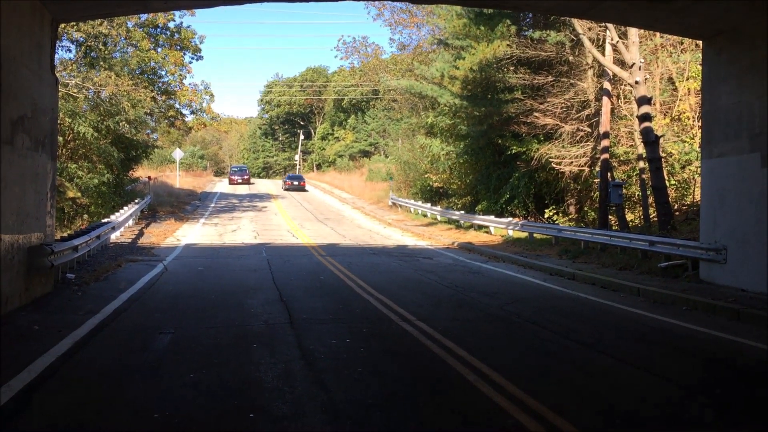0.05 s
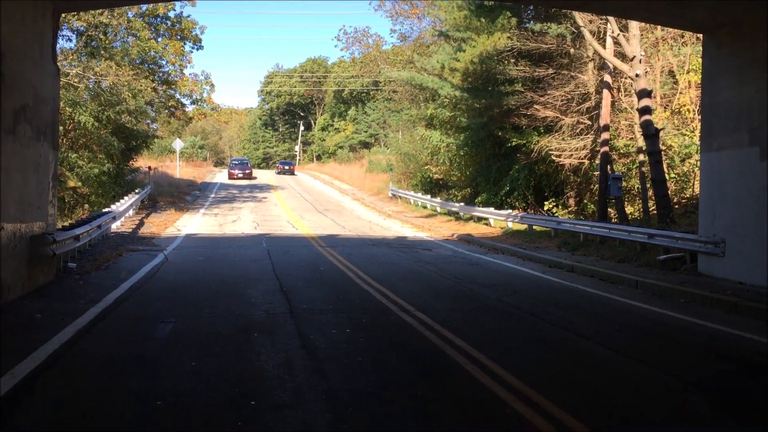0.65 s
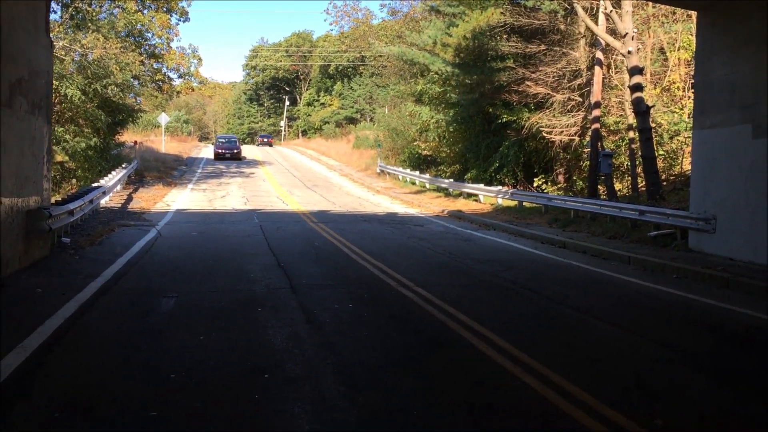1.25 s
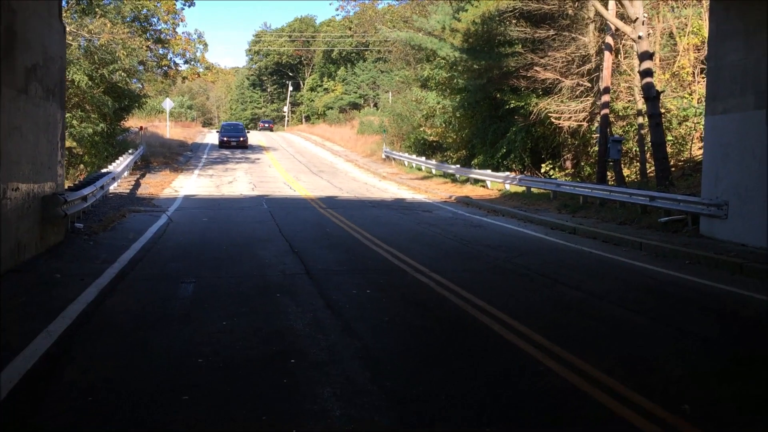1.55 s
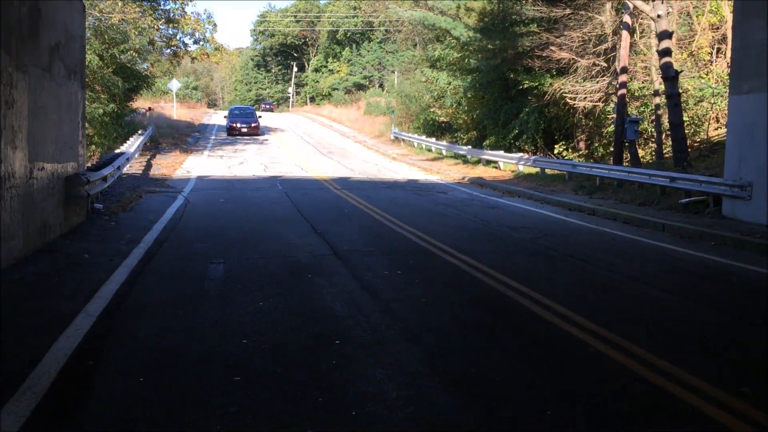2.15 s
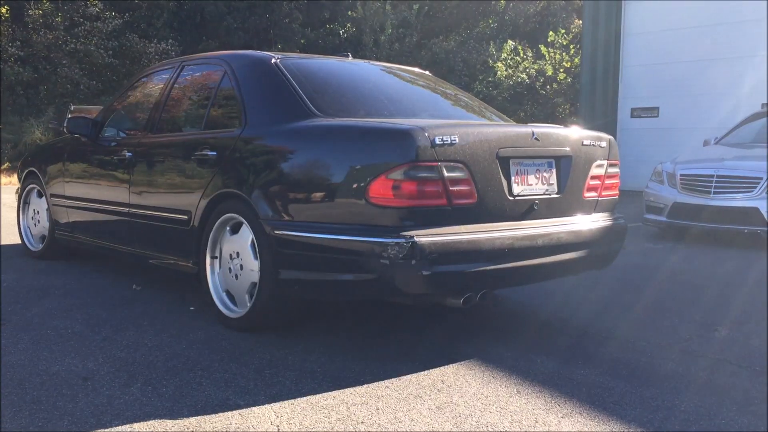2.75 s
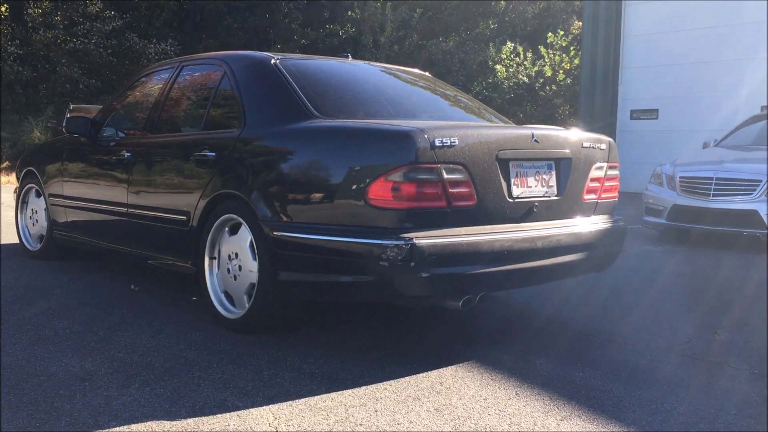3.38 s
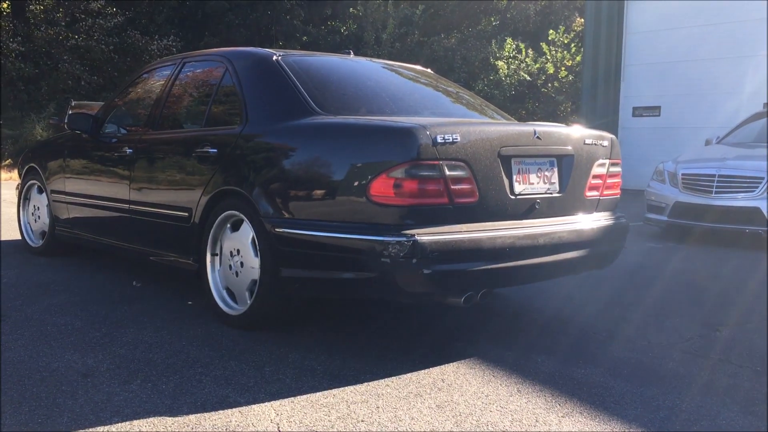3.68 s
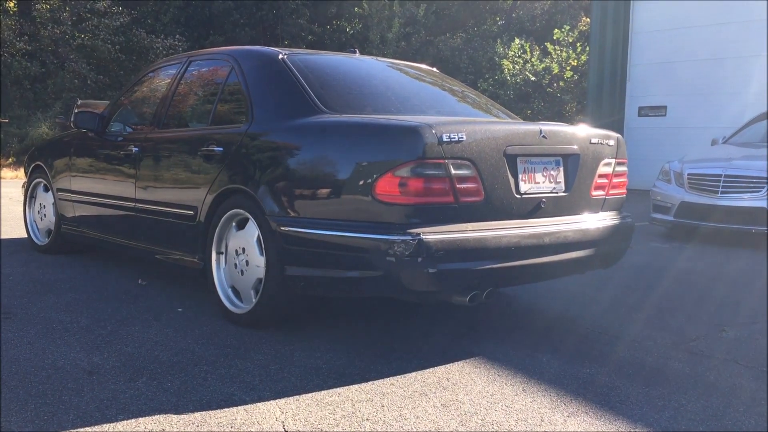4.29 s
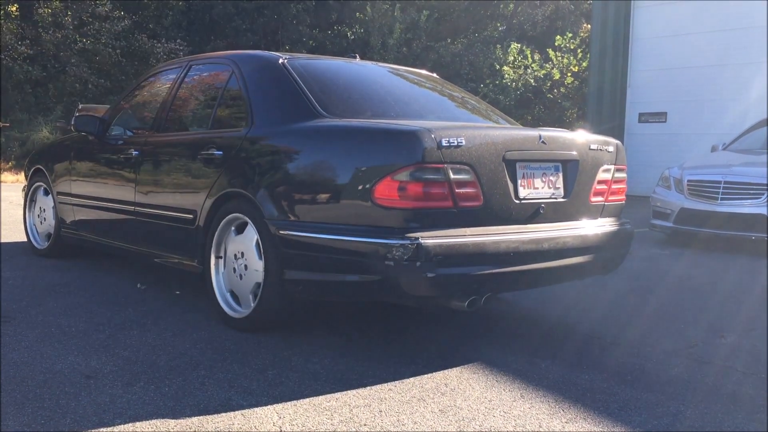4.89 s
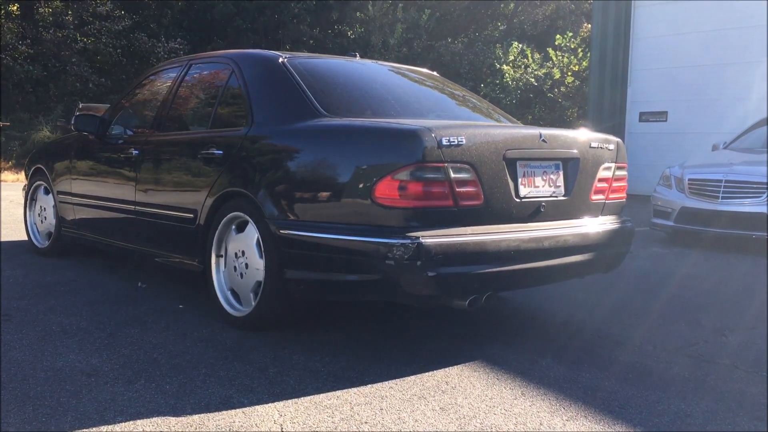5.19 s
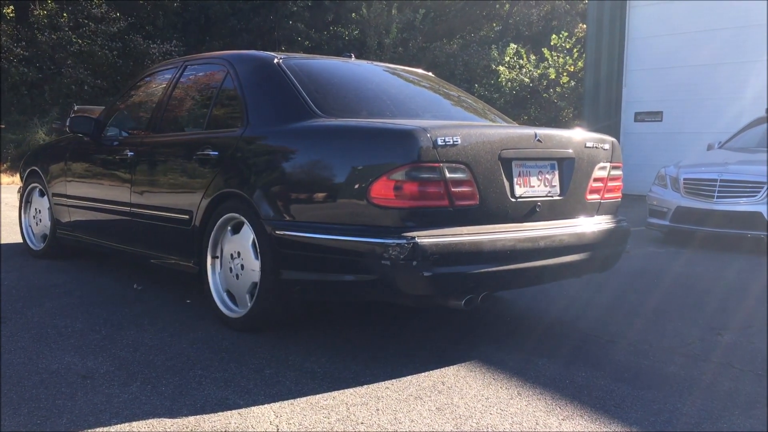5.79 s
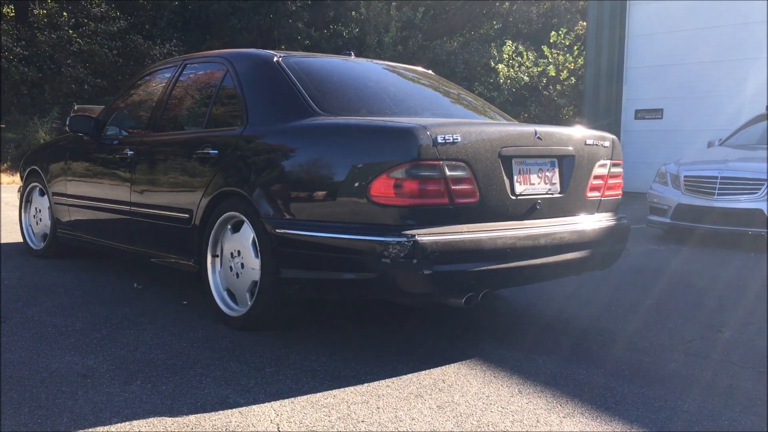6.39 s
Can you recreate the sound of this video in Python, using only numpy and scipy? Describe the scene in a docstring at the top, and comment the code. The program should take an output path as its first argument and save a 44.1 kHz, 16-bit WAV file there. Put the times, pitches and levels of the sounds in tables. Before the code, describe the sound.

A car drones in the distance on an outdoor road. At about 0.7 seconds the throttle shuts and the drone fades into a low rumble, while tyre roar comes forward, with several light knocks over road cracks between 1.5 and 2.4 seconds. The sound cuts to a very brief silence just before 2.5 seconds.

A V8 then rumbles unevenly a few metres away. It is revved at about 2.7 seconds, booming and growling with a rush of exhaust gas, peaks near 3.2 seconds and sinks slowly. A second, sharper and higher rev starts at 4.8 seconds and peaks around 5.2, with a bright hiss and small tailpipe spits that trail off by 6 seconds. After each rev, a breathy rasp, a mechanical whirr and faint falling whines come through. The engine is still dropping towards idle at the end, around 6.5 seconds.

```python
"""A V8 saloon is revved twice a few metres away, sinking slowly back towards idle after each blip.
Firings boom in the exhaust over the lope of uneven cylinders, the pipes growl, gas rushes and spits
from the tailpipes, and chain and pulleys whine through the whirr under the bonnet.
Before that, the car approaches an underpass from far off: its drone fades as the throttle shuts and
the tyre roar takes over. A short silence separates the two scenes."""
import sys
import numpy as np
from scipy import signal
from scipy.fft import rfft, irfft
from scipy.io import wavfile
from scipy.ndimage import uniform_filter1d

SR = 44100
rng = np.random.default_rng(int(sys.argv[2]) if len(sys.argv) > 2 else 0)


def store_wav(level_fs):
    """Save 16-bit WAV to argv[1]."""
    pcm = np.round(np.clip(np.atleast_2d(level_fs), -1, 1) * 32767)
    wavfile.write(sys.argv[1], SR, pcm.T.astype(np.int16))


N = 288414
TIME = np.arange(N) / SR
CYLINDERS = 8


def undb(db):
    """Decibels to gain."""
    return 10 ** (np.asarray(db) / 20)


def curve(table):
    """Breakpoints joined into a control over time."""
    return np.interp(TIME, *np.transpose(table))


def ramp(start, length):
    """From 0 to 1 in a straight line."""
    return np.clip((TIME - start) / length, 0, 1)


def bump(centre, width):
    """Smooth rise and fall around a moment."""
    return np.exp(-.5 * ((TIME - centre) / width) ** 2)


def burst(start, decay):
    """Instant attack, exponential decay."""
    age = TIME - start
    return (age >= 0) * np.exp(-np.clip(age / decay, 0, 40))


def unit(x):
    """Scale to rms 1."""
    return x / np.sqrt(np.mean(x ** 2))


def response(spectrum, hz):
    """Gain of an EQ curve at hz, falling 40 dB per octave beyond its ends."""
    f, db = np.transpose(spectrum)
    octave = np.log2(np.maximum(hz, 1))
    beyond = np.abs(octave - np.clip(octave, np.log2(f[0]), np.log2(f[-1])))
    return undb(np.interp(octave, np.log2(f), db) - 40 * beyond)


def colour(x, spectrum):
    """Filter through an EQ curve; rms 1."""
    return unit(irfft(rfft(x) * response(spectrum, np.fft.rfftfreq(N, 1 / SR)), N))


def noise(spectrum):
    """Coloured noise; rms 1."""
    return colour(rng.standard_normal(N), spectrum)


def ticks(hits, spectrum, decay_s):
    """Short bursts of noise at (t/s, level/dB), rung through one EQ curve."""
    envelope = sum(undb(db) * burst(t, decay_s) for t, db in hits)
    gain = unit(response(spectrum, np.fft.rfftfreq(N, 1 / SR)))
    return irfft(rfft(rng.standard_normal(N) * envelope) * gain, N)


def drift(rate_hz):
    """Smooth random wander; rms 1."""
    knots = rng.standard_normal(2000)
    coarse_time = TIME[::32]
    path = np.interp(coarse_time * rate_hz, np.arange(len(knots)), knots)
    half_step = max(int(len(path) / TIME[-1] / rate_hz / 2), 1)
    return unit(np.interp(TIME, coarse_time, uniform_filter1d(path, half_step)))


def partials(cycle, table, rough, rate_hz, swell_db=0, gain_at=lambda order: 1):
    """Wavering tones at orders (multiples) of the engine cycle rate; rms near 1."""
    tones, power = 0, 0
    for order, db in table:
        gain = undb(db) * gain_at(order)
        waver = 1 + rough * (drift(rate_hz) + 1j * drift(rate_hz))
        swell = undb(swell_db * np.tanh(drift(4)))
        tone = np.exp(2j * np.pi * (order * cycle + rng.random()))
        tones += gain * swell * np.real(waver * tone)
        power += gain ** 2 * (1 + 2 * rough ** 2) / 2
    return tones / np.sqrt(power)


def blend(a, b, share):
    """Equal-power mix, with the given share of a."""
    return np.sqrt(share) * a + np.sqrt(1 - share) * b


def machine_noise(cycle, spectrum, locked, grains):
    """Clatter that repeats on every engine cycle, and fresh turbulence, through the same resonances."""
    pattern = signal.resample(rng.standard_normal(grains), 8 * grains)
    clatter = np.interp(cycle % 1, np.arange(len(pattern)) / len(pattern), pattern)
    return blend(colour(clatter, spectrum), noise(spectrum), locked)


def layer_db(law, firing_hz, throttle):
    """A layer's fader, riding engine speed and throttle; a power under 1 makes it answer early."""
    # coasting, then full load: level/dB at 120 firings a second, slope/(dB per octave); throttle power
    coast_db, coast_slope, load_db, load_slope, power = law
    octaves = np.log2(firing_hz / 120)
    load = throttle ** power
    return (1 - load) * (coast_db + coast_slope * octaves) + load * (load_db + load_slope * octaves)


# cracks in the road: t/s, knock level/dB, tick level/dB
CRACKS = [(.484, -25, -41), (1.45, -19.5, -39), (1.700, -17.5, -40), (1.884, -12.5, -34), (1.951, -18, -40),
          (2.135, -18, -23.5), (2.235, -21, -30), (2.357, -20, -27.5)]
# dry tick of the tread: f/Hz, level/dB
TICK_EQ = [(800, -12.5), (1400, 13), (2200, -2.5), (3600, -13), (4500, -22), (6000, -46)]

def road_cracks(ring_hz=960, decay_s=.0043):
    """Each crack rings the tyre tread briefly, with a dry tick on top."""
    knocks = sum(undb(db) * burst(t, decay_s) * np.sin(2 * np.pi * ring_hz * (TIME - t))
                 for t, db, _ in CRACKS)
    distant = signal.sosfilt(signal.butter(4, 2200, fs=SR, output="sos"), knocks)
    return distant + ticks([(t, db) for t, _, db in CRACKS], TICK_EQ, decay_s=.0037)


# tyre roar and fine tread hiss: f/Hz, level/dB
ROAR_EQ = [(300, -25), (650, -6), (980, 1), (1250, -3.5), (1700, -12), (2500, -21), (3500, -27),
           (5000, -49), (8000, -63.5), (15000, -71)]
TREAD_EQ = [(4500, 0.5), (7000, -6), (10000, -16), (15500, -21)]
# fader of the roar: t/s, level/dB
ROAR_FADER = [(0, -33.5), (.6, -34.5), (.85, -29.5), (1.3, -28.5), (2.45, -32.5)]

def tyres():
    """Tyres roar on the road, their treble opening up as the car comes nearer."""
    roar = noise(ROAR_EQ) * undb(curve(ROAR_FADER) + 1.6 * drift(45.35))
    nearing = undb(-82 + 4.5 * TIME)
    opening_hiss = undb(-57) * burst(0, .2)
    return roar + noise(TREAD_EQ) * (nearing + opening_hiss)


# engine speed on the approach: t/s, cycle rate/Hz
FAR_SPEED = [(0, 35.62), (.18, 32.6), (.4, 33.84), (.8, 34.27), (1.05, 31.8), (1.45, 32.28), (2.1, 28.17),
             (2.45, 26.76)]
# distant drone: order, level/dB
DRONE_ORDERS = [(2, -7), (3, -15.5), (4, 1.5), (5, -9), (6, -11.5), (7, -8.5), (8, -11.5), (10, -33),
                (12, -23)]
# rumble and rasp under the bridge: f/Hz, level/dB
FAR_RUMBLE_EQ = [(18, -57.5), (30, -25), (64, -22.5), (124, -4.5), (156, -12.5), (220, -11), (344, -30),
                 (400, -32.5), (520, -53), (880, -120)]
FAR_RASP_EQ = [(250, -14), (400, 1.5), (550, 4), (800, -3), (1500, -12), (2600, -19.5), (3500, -23.5),
               (5000, -33), (8000, -48), (15000, -65.5)]

def far_exhaust(lift_off_s=(.67, .81), fade_db_per_s=1):
    """The driver lifts off: the distant drone drops and dissolves into rumble, and a thin whistle stops."""
    cycle = np.cumsum(curve(FAR_SPEED)) / SR
    throttle = np.interp(TIME, lift_off_s, [1, 0])
    level_db = -18.5 - fade_db_per_s * TIME + (1 - throttle) * (-8 + 1.7 * drift(6.9))
    drone = partials(cycle, DRONE_ORDERS, rough=.14, rate_hz=9)
    body = blend(drone, noise(FAR_RUMBLE_EQ), .45 + .5 * throttle)
    rasp = machine_noise(cycle, FAR_RASP_EQ, locked=.29, grains=256) * undb(-13.5)
    whistle = partials(cycle, [(104, 0)], rough=.7, rate_hz=60)
    return (body + rasp) * undb(level_db) + whistle * throttle * undb(-59.5)


# early reflections off the ground and a wall: delay/s, level/dB
REFLECTIONS = [(.0067, -15.5), (0.0175, -16.5), (.029, -16.5)]

def reflected(x):
    """The direct sound plus its near reflections."""
    return x + sum(undb(db) * np.interp(TIME - delay, TIME, x, left=0) for delay, db in REFLECTIONS)


# whines that ring the engine bay: order, level at resonance/dB
RINGING_ORDERS = [(32, -33), (36, -42.5), (50, -50), (51, -45.5), (63, -50), (64, -46)]

def bay_whistles(cycle, cycle_hz, ring_hz=1184, width_hz=100):
    """Each whine whistles briefly as the revs carry it through a resonance of the engine bay."""
    whistles = 0
    for order, db in RINGING_ORDERS:
        detune = 2 * (order * cycle_hz - ring_hz) / width_hz
        whistles += undb(db) / (1 + detune ** 2) * partials(cycle, [(order, 0)], rough=.17, rate_hz=25)
    return whistles


# chain and pulley whine: order, level/dB
WHINE_ORDERS = [(32, -12), (36, -2), (38, -14), (40, -19), (43, -15), (45, -4), (50, 0), (51, -7), (56, -5),
                (63, -1), (64, -8), (72, 2.5), (79, -0.5), (85, -6), (88, 0)]
# that whine through the bay, one clear accessory whine, the mechanical whirr: f/Hz, level/dB
BAY_EQ = [(350, -19), (600, -9.5), (850, -10), (1150, -4), (1500, -15.5), (2300, -4), (3200, -25)]
ACCESSORY_EQ = [(480, -14), (600, -1), (830, -4), (1000, -11)]
WHIRR_EQ = [(470, -6), (800, -3), (879, 0), (929, -4.5), (1050, 1.5), (1170, 0.5), (1530, -5.5),
            (2260, -4.5), (2700, -6.5), (2940, -11.5), (3230, -9.5), (4440, -15.5), (4920, -24),
            (5660, -19.5), (7500, -26), (9750, -61), (16500, -120)]
WHIRR_LAW = (-39, 3.5, -36, 5, 5)

def bonnet(cycle, cycle_hz, puff, throttle, coasting, accessory_order=36):
    """The engine whirrs; chain, pulleys and an accessory whine through it while it coasts."""
    chain = partials(cycle, WHINE_ORDERS, rough=.7, rate_hz=30, swell_db=4,
                     gain_at=lambda order: response(BAY_EQ, order * cycle_hz))
    accessory = partials(cycle, [(accessory_order, 0)], rough=.54, rate_hz=25, swell_db=4)
    accessory *= response(ACCESSORY_EQ, accessory_order * cycle_hz)
    whines = chain * undb(-8.5) + accessory * undb(-9.5)
    whirr = machine_noise(cycle, WHIRR_EQ, locked=.28, grains=512)
    flutter = unit(undb(.5 * puff + 1.44 * drift(60)))
    level_db = layer_db(WHIRR_LAW, CYLINDERS * cycle_hz, throttle)
    return (whines * coasting + whirr * flutter) * undb(level_db)


# breathy pumping rasp: f/Hz, level/dB
PUMP_EQ = [(1100, -8), (1700, 3), (2400, -1), (2900, -4), (4000, -11)]

def pumping_rasp(cycle, cycle_hz, pump):
    """The coasting engine rasps as it pumps, louder at higher revs."""
    rasp = machine_noise(cycle, PUMP_EQ, locked=.19, grains=384)
    return rasp * pump * undb(-37) * cycle_hz / cycle_hz.max()


# runs of tailpipe spits: t/s, first level/dB, length/s (0 for a single spit)
SPIT_RUNS = [(2.95, -28, 0), (5.0254, -14, 0), (5.0867, -14, 0), (5.2751, -22, .22), (5.7694, -30, 0),
             (5.8366, -30, 0), (5.9744, -29, 0)]
# sharp edge of a spit: f/Hz, level/dB
SPIT_EQ = [(3000, -30), (7000, -6), (10000, -2), (12700, 2), (15500, -11)]

def spits(cycle, fade_db_per_s=43):
    """In each run one cylinder spits on every engine cycle, more and more weakly."""
    hits = []
    for start, db, length in SPIT_RUNS:
        first, last = np.interp([start, start + length], TIME, cycle)
        repeats = np.interp(first + np.arange(1, int(last - first) + 1), cycle, TIME)
        hits += [(t, db - fade_db_per_s * (t - start)) for t in [start, *repeats]]
    return ticks(hits, SPIT_EQ, decay_s=.00083) * undb(-.5)


# fast jet and gentler rush of gas: f/Hz, level/dB
JET_EQ = [(3000, -7), (5000, 1.5), (6500, 1), (8500, 3.5), (9800, 2.5), (10400, -8), (12000, 1),
          (15500, -6)]
RUSH_EQ = [(1500, -23), (3500, -7.5), (4400, -2.5), (4950, -5), (5700, 1.5), (7500, -6.5), (9600, -2.5),
           (10400, -10), (12000, -10), (15500, -14.5)]

def tailpipe_gas(puff, flow):
    """Gas leaves with each pressure swing; strong flow turns the rush into a bright, spluttering jet."""
    jet = noise(JET_EQ) * unit(undb(2 * puff + 1.75 * drift(150)))
    rush = noise(RUSH_EQ) * unit(undb(.81 * puff + drift(120)))
    return blend(jet, rush, flow)


# pitched growl: order, level/dB
GROWL_ORDERS = [(14, -2), (16, -6), (17, 4.5), (18, -5), (19, -3.5), (20, 1.5), (21, -9), (22, -1), (24, 3),
                (25, -1.5), (26, 4.5), (27, -11), (28, -25), (30, -30)]
# midrange voice of the pipes: f/Hz, level/dB
PIPE_EQ = [(150, -13), (280, 10), (380, 4.5), (480, 2.5), (590, 3), (720, -5), (900, -19), (1400, -54),
           (3000, -63)]
PIPE_LAW = (-44.5, 8.5, -29.5, 7.5, .85)

def pipe_growl(cycle, cycle_hz, puff, throttle, flow):
    """The pipes growl, and strong flow tears the growl into a turbulent bark."""
    growl = partials(cycle, GROWL_ORDERS, rough=.37, rate_hz=13,
                     gain_at=lambda order: response(PIPE_EQ, order * cycle_hz))
    bark = machine_noise(cycle, PIPE_EQ, locked=.1, grains=192) * unit(1 + .44 * puff)
    level_db = layer_db(PIPE_LAW, CYLINDERS * cycle_hz, throttle) + 2.4
    return blend(bark, growl, .58 + .37 * flow) * undb(level_db)


# lope of uneven cylinders: order, level/dB
LOPE_ORDERS = [(2, -7.5), (3, -4.5), (5, -6), (6, 1), (7, -10.5), (9, -10.5), (10, -4), (11, -10.5),
               (12, -12.5), (13, -9.5), (14, -10)]
# muffler, firing tone coasting, firing tone under load, throb of one bank: f/Hz, level/dB
MUFFLER_EQ = [(25, -22), (45, -8), (62, -6), (85, 2), (120, 0), (185, 0), (220, -7), (290, -16.5),
              (400, -33), (800, -48)]
COAST_EQ = [(44, -36), (70, -26), (100, -19.5), (115, -17), (128, -11.5), (145, -21), (180, -19.5),
            (210, -24), (245, -36), (290, -27)]
LOAD_EQ = [(60, -1), (80, -8), (98, -2.5), (115, -4.5), (140, -6.5), (215, -9.5), (255, -18.5),
           (290, -13.5)]
BANK_EQ = [(22, -56), (33, -52), (52, -33), (64, -31), (72, -24), (90, -26.5), (105, -24), (140, -17.5)]
# brief swells and dips of the boom: t/s, level/dB, half-width/s
SURGES = [(2.514, 0, 0.011), (2.58, 6, 0.0107), (2.623, -6.5, 0.033), (4.727, -12, 0.0075),
          (6.53, 2.5, 0.038)]
LOPE_LAW, OVERTONE_LAW = (-23, 3.5, -17, -1, .3), (-37.5, -4.5, -14.5, 1, .5)

def exhaust_boom(cycle, cycle_hz, throttle):
    """Eight firings a cycle make the main tone, one bank's four a throb; unequal firings add the lope."""
    firing_hz = CYLINDERS * cycle_hz
    phase = 2 * np.pi * CYLINDERS * cycle
    firing = np.sqrt(2) * np.sin(phase + .026 * drift(31)) * undb(.5 * drift(25))
    firing *= response(COAST_EQ, firing_hz) ** (1 - throttle) * response(LOAD_EQ, firing_hz) ** throttle
    throb = np.sqrt(2) * np.sin(phase / 2 + .059 * drift(7.4)) * undb(2.6 * drift(9))
    throb *= response(BANK_EQ, firing_hz / 2) * undb(3 * throttle)
    lope = partials(cycle, LOPE_ORDERS, rough=.2, rate_hz=10,
                    gain_at=lambda order: response(MUFFLER_EQ, order * cycle_hz))
    uneven = np.minimum(1, (105 / firing_hz) ** 1.5)  # slow running burns less evenly
    burble = noise(MUFFLER_EQ) * undb(-7 + 2.5 * drift(22)) * uneven
    rumble = (lope + burble) * undb(layer_db(LOPE_LAW, firing_hz, throttle))
    overtones = 0
    for harmonic, db in [(2, 0), (3, -4)]:
        tone = np.sqrt(2) * np.sin(harmonic * phase + 2 * np.pi * rng.random())
        overtones += tone * undb(db) * response(MUFFLER_EQ, harmonic * firing_hz)
    overtones *= undb(layer_db(OVERTONE_LAW, firing_hz, throttle))
    stumble = undb(2.1 * drift(21.99) * uneven * (1 - throttle))
    # under throttle each turn of the crankshaft, two a cycle, thuds in the pipes
    thud = np.sin(4 * np.pi * cycle) * response(MUFFLER_EQ, 2 * cycle_hz) * throttle * undb(-16.5)
    boom = thud + stumble * (firing + throb + overtones + rumble)
    return boom * undb(sum(db * bump(t, width) for t, db, width in SURGES))


# throttle blips: open t/s, rise/s, shut t/s, fall/s, opening 0-1, lull t/s, lull level/dB
BLIPS = [(2.72, 0.18, 2.948, 0.18, 0.9, 3.19, -4), (4.785, 0.046, 5.08, 0.14, 1, 5.2, -10)]

def pedal():
    """Controls for each blip: the throttle opens and shuts, the pipes lull, then the engine pumps."""
    throttle, lull_db, pump = 0, 0, 0
    for opens, rise, shuts, fall, opening, lull, depth_db in BLIPS:
        throttle += opening * ramp(opens, rise) * (1 - ramp(shuts, fall))
        lull_db += depth_db * bump(lull, width=.047)
        pump += bump(lull + .13, width=.14)
    return np.clip(throttle, 0, 1), lull_db, pump


# engine speed of the standing car: t/s, cycle rate/Hz
REV_SPEED = [(2.52, 5.3), (2.68, 5.7), (2.76, 6.84), (2.84, 8.9), (2.93, 14.3), (2.99, 17.7), (3.1, 21.1),
             (3.2, 22.3), (3.57, 18.55), (3.79, 16.8), (4.12, 15.26), (4.19, 14.35), (4.56, 13.3),
             (4.78, 12.4), (4.8, 12.7), (4.95, 22.7), (5.04, 33.4), (5.19, 36.2), (5.65, 29.2),
             (5.94, 24.3), (6.35, 18.65), (6.53, 17.3)]
GAS_LAW = (-51, 5.5, -37, 4, 1.6)

def revving():
    """The V8 close up: engine speed and pedal drive the exhaust and engine bay layers together."""
    cycle_hz = curve(REV_SPEED)
    cycle = np.cumsum(cycle_hz) / SR
    throttle, lull_db, pump = pedal()
    coasting = (1 - throttle) * undb(lull_db)
    puff = np.sin(2 * np.pi * CYLINDERS * cycle)  # pressure swing of each firing
    gas_db = layer_db(GAS_LAW, CYLINDERS * cycle_hz, throttle) + .48 * lull_db + 2.5 * pump
    flow = np.clip((gas_db + 47) / 12, 0, 1)  # 0 coasting slowly, 1 wide open at high revs
    boom = exhaust_boom(cycle, cycle_hz, throttle) * undb(lull_db)
    growl = pipe_growl(cycle, cycle_hz, puff, throttle, flow) * undb(.5 * lull_db)
    whirr = bonnet(cycle, cycle_hz, puff, throttle, coasting)
    rasp = pumping_rasp(cycle, cycle_hz, pump)
    gas = tailpipe_gas(puff, flow) * undb(gas_db + 1.5)
    whistles = bay_whistles(cycle, cycle_hz) * coasting
    return boom + growl + reflected(whirr + rasp + gas) + whistles + spits(cycle)


def scene():
    """The approach, a short silence, then the standing car."""
    approach = far_exhaust() + tyres() + road_cracks()
    far_gate = ramp(0, .004) * (1 - ramp(2.457, .001))
    near_gate = ramp(2.513, .001)
    return (far_gate * approach + near_gate * revving())[None]


def record(dry):
    """Drop the deepest bass, round the highest peaks and cut the top."""
    low_cut_hz, top_hz = 33, 15850
    thin = signal.sosfilt(signal.butter(3, low_cut_hz, "highpass", fs=SR, output="sos"), dry)
    rounded = thin / (1 + thin ** 8) ** (1 / 8)
    return signal.sosfilt(signal.ellip(10, .2, 80, top_hz, fs=SR, output="sos"), rounded)


dry = scene()
out = record(dry)
store_wav(out)
```